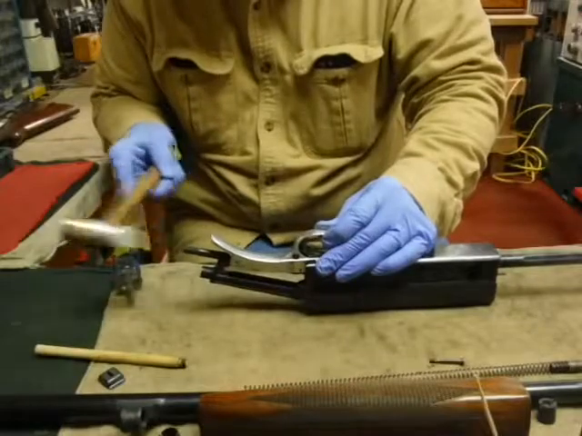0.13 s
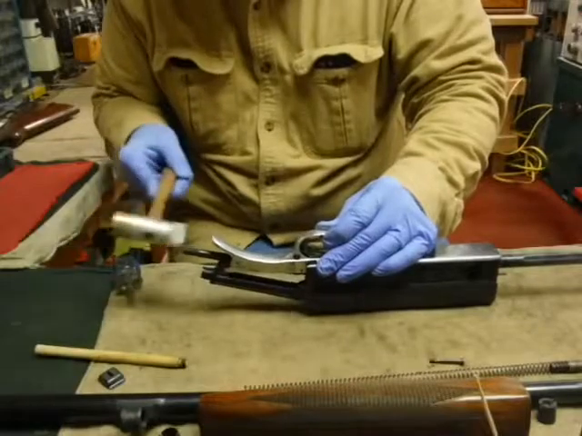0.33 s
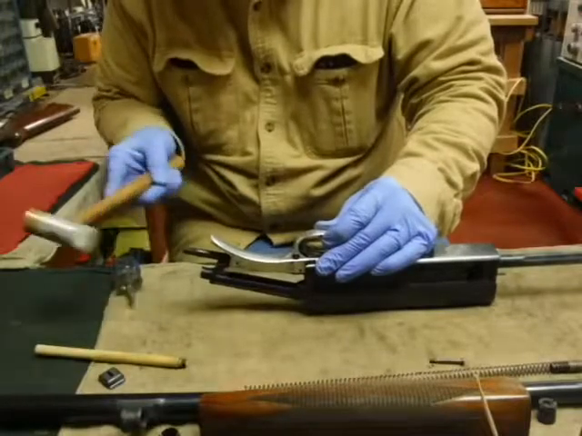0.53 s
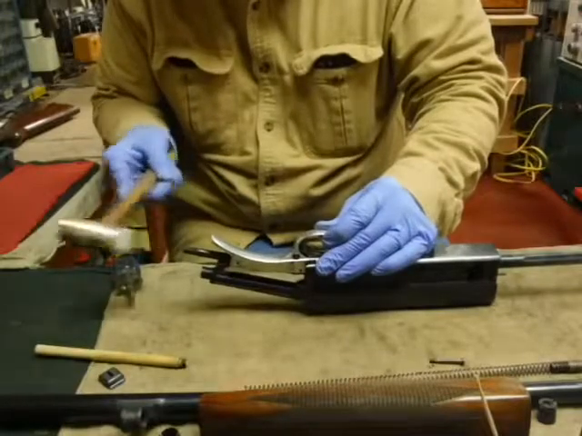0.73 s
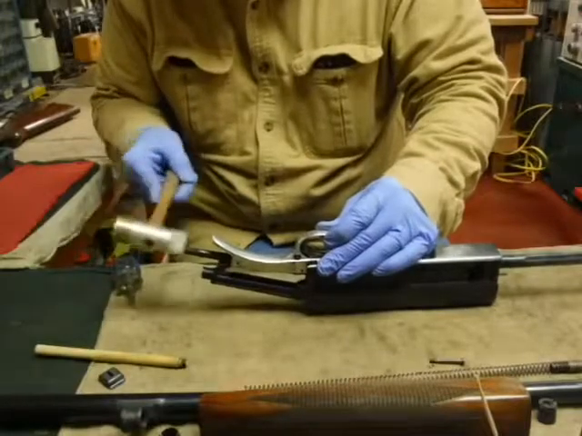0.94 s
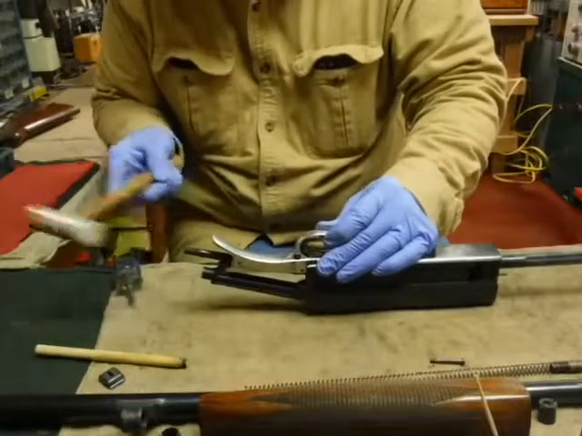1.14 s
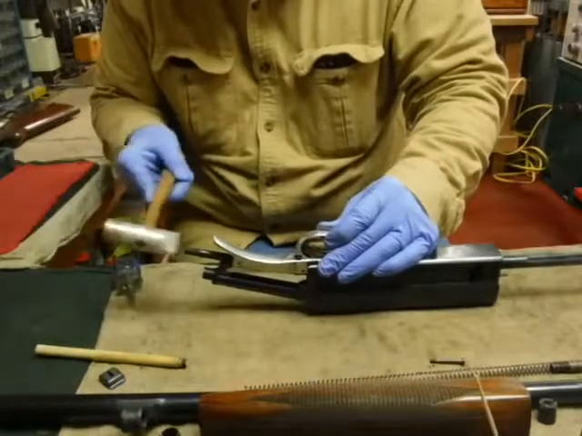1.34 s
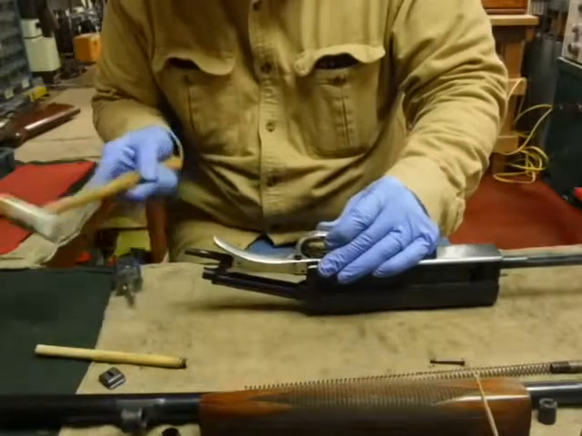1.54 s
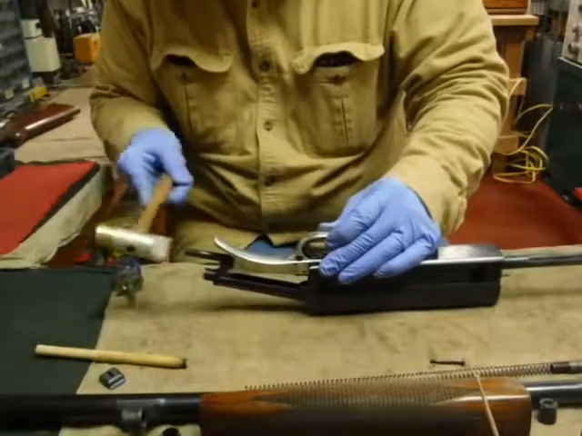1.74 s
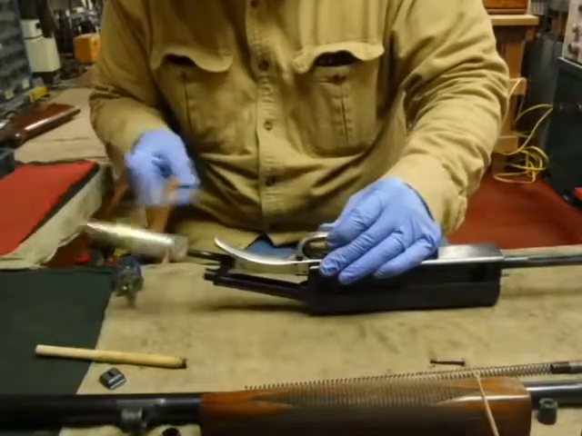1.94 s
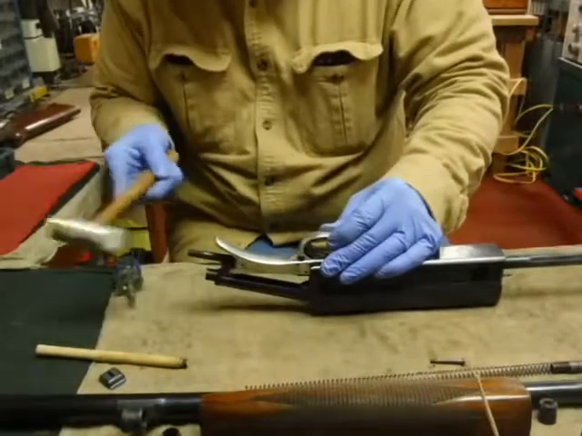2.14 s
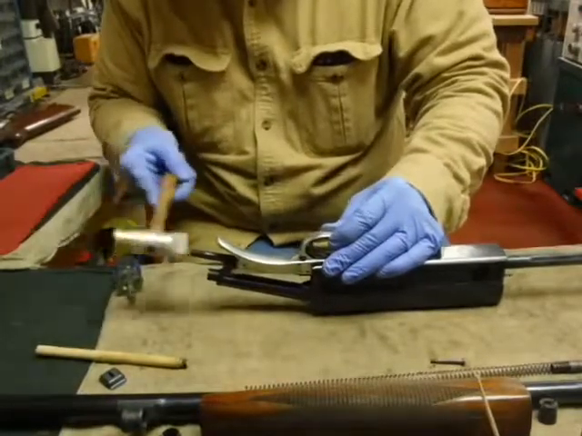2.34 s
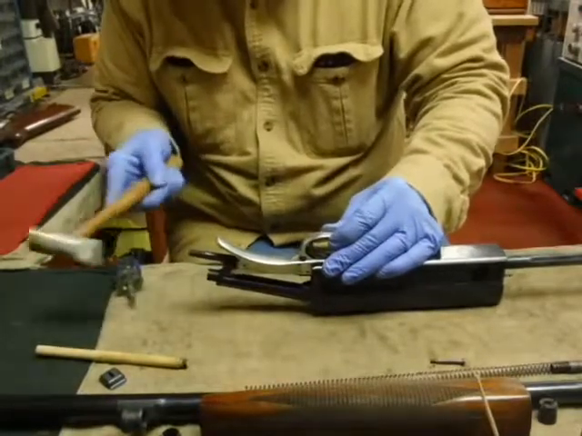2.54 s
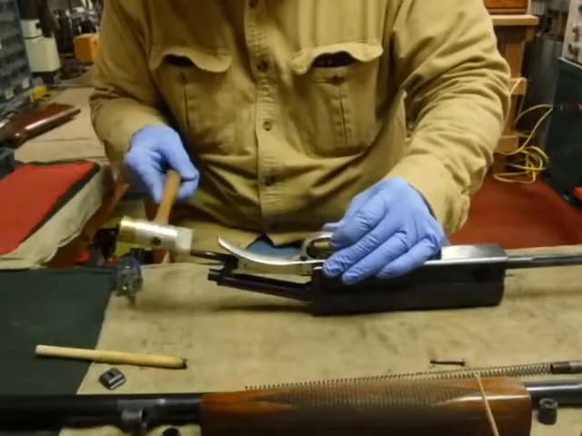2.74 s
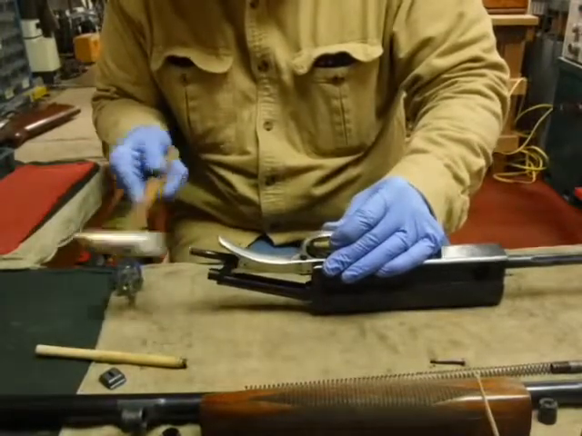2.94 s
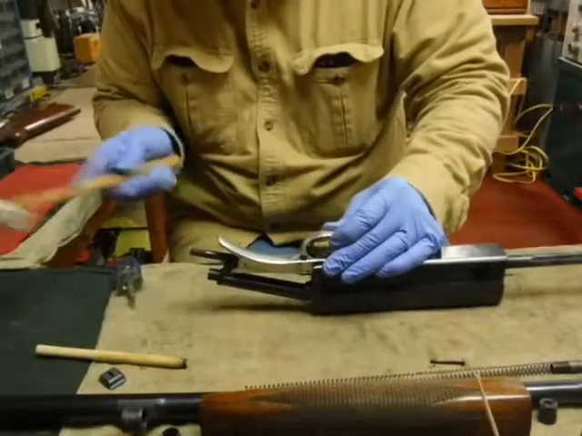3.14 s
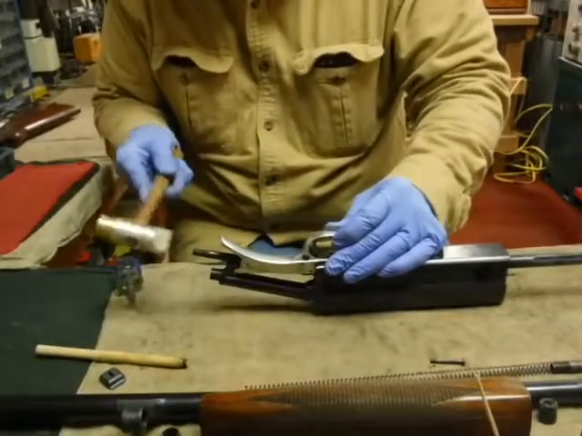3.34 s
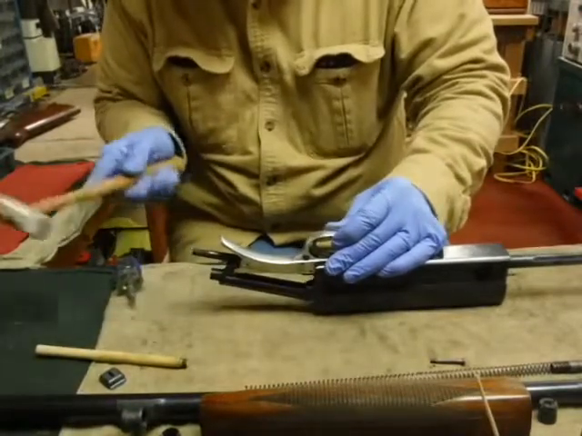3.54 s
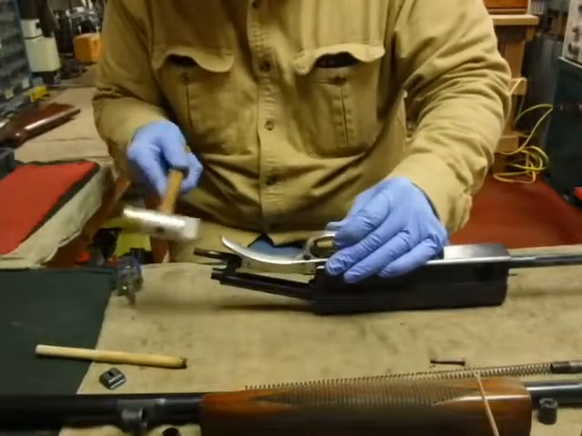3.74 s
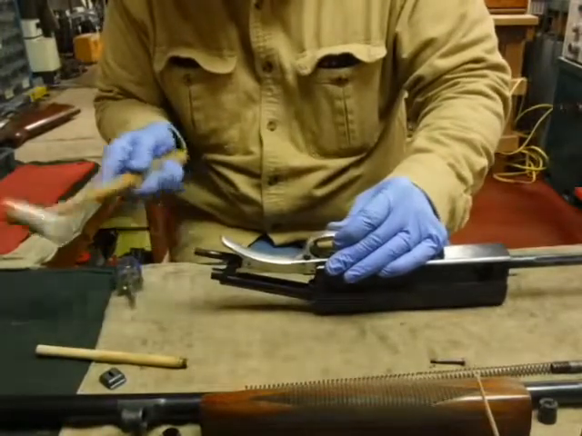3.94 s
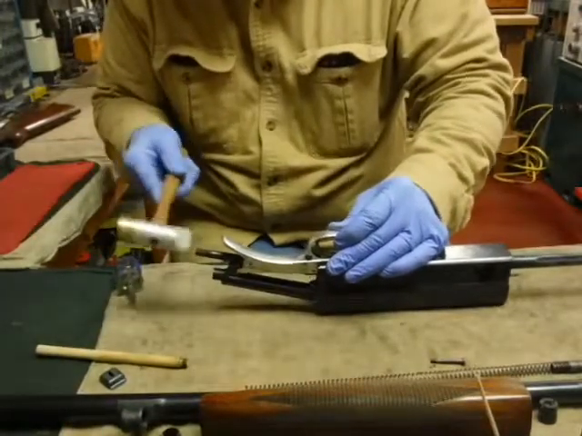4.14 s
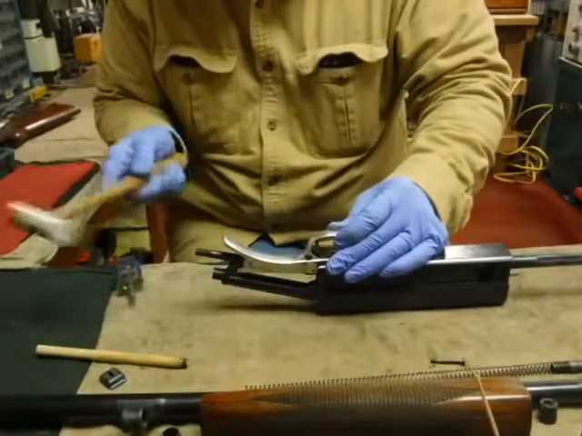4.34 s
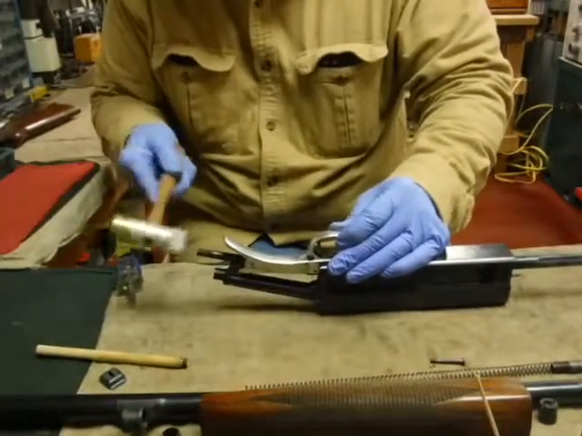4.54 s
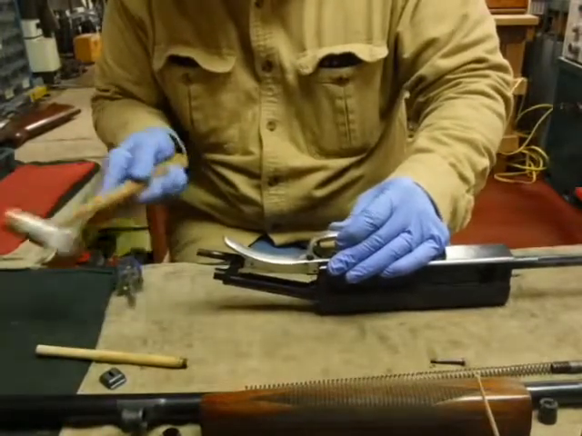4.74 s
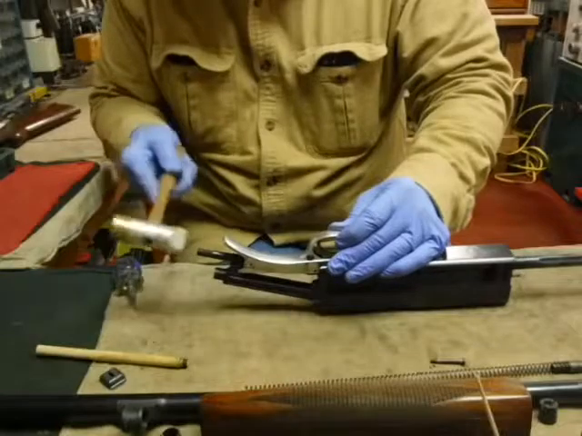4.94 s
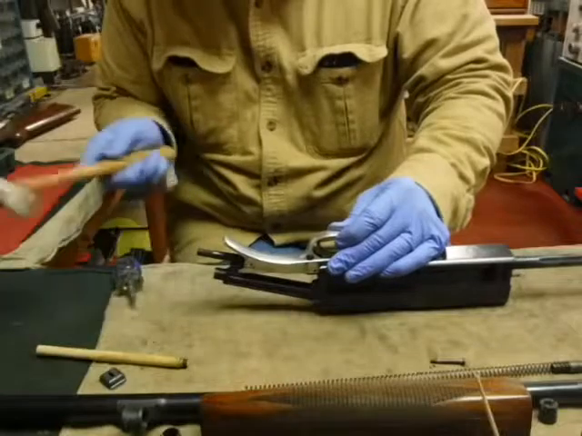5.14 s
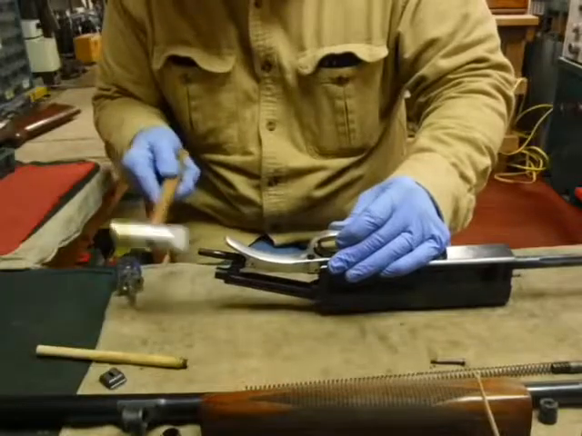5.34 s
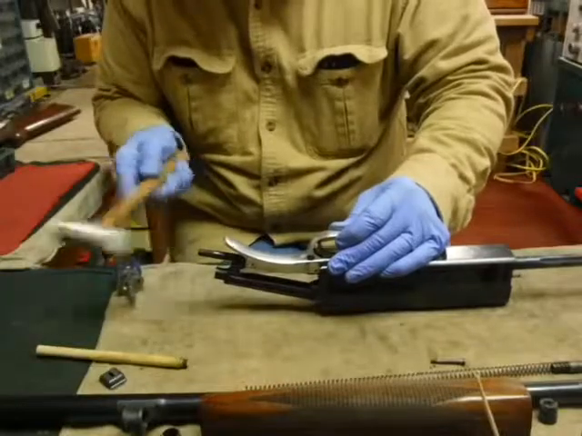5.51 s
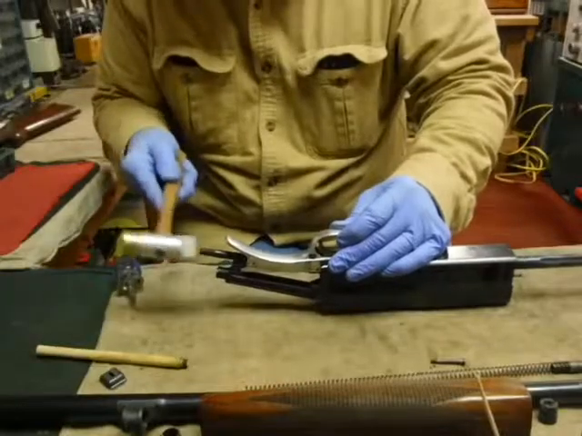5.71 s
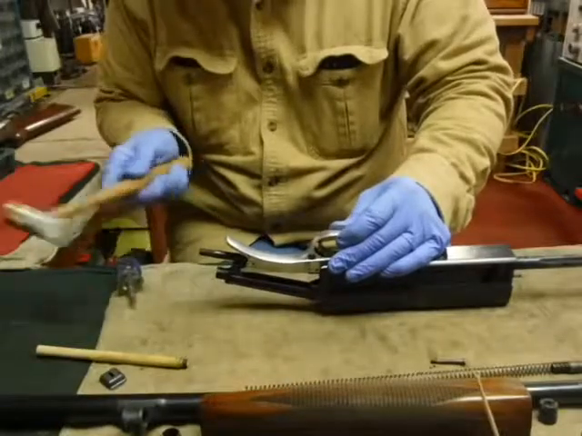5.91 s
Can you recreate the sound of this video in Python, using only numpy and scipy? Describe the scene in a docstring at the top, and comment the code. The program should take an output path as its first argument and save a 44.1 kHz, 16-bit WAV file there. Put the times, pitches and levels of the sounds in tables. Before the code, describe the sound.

In a small, lively workshop, a little hammer knocks steadily on a metal part held against a bench. The strikes crack brightly, ring briefly and thud into the padded top, distorting the close microphone a little. They grow harder past the middle, and the ring shifts higher as the part is driven home. Between strikes there are tiny ticks from loose pieces, a single dry click and quiet room tone with a low hum.

```python
"""A small steel hammer taps a metal assembly held on a padded workbench, about three blows a second.
Each blow cracks, rings the metal and thumps the bench; a small, lively workshop answers.
The blows grow harder; as the part is driven home the ring passes from frame to lever.
The close microphone overloads on the blows. Between them: faint ticks of loose parts,
one dry click, room tone with a motor's hum."""
import sys
import numpy as np
from scipy import signal
from scipy.fft import rfft, irfft
from scipy.io import wavfile

SR = 44100
rng = np.random.default_rng(int(sys.argv[2]) if len(sys.argv) > 2 else 0)


def persist_wave(psi):
    """Save psi, clipped to +-1, as 16-bit WAV."""
    counts = np.round(np.clip(psi, -1, 1) * 32767).astype(np.int16)
    wavfile.write(sys.argv[1], SR, np.atleast_2d(counts).T)


N = 263256
RING_SAMPLES, ROOM_SAMPLES, LEAD_SAMPLES = SR // 5, SR // 2, SR // 5


def from_db(db):
    """Decibels to gain."""
    return 10 ** (np.asarray(db) / 20)


def at_hz(points, hz):
    """Read (Hz, value) rows on a log-frequency axis."""
    known_hz, values = np.transpose(points)
    return np.interp(np.log(np.maximum(hz, 1)), np.log(known_hz), values)


def coloured(sound, spectrum):
    """Filter by a spectrum of (Hz, dB) rows."""
    hz = np.fft.rfftfreq(len(sound), 1 / SR)
    return irfft(rfft(sound) * from_db(at_hz(spectrum, hz)), len(sound))


def fade(t60_s, samples):
    """Exponential decay, 60 dB in t60_s."""
    return np.exp(-np.log(1000) * np.arange(samples) / (SR * t60_s))


def add(track, sound, start_s):
    """Mix into a track that begins LEAD_SAMPLES before time zero."""
    start = max(round(start_s * SR) + LEAD_SAMPLES, 0)
    part = sound[:len(track) - start]
    track[start:start + len(part)] += part


def blend(kept, share):
    """Noise with a share of its power in common with the kept noise."""
    return np.sqrt(share) * kept + np.sqrt(1 - share) * rng.standard_normal(len(kept))


def pulse(spectrum):
    """Minimum-phase pulse with a spectrum of (Hz, dB) rows."""
    hz = np.fft.rfftfreq(RING_SAMPLES, 1 / SR)
    cepstrum = irfft(np.log(from_db(at_hz(spectrum, hz))), RING_SAMPLES)
    cepstrum[1:RING_SAMPLES // 2] *= 2
    cepstrum[RING_SAMPLES // 2 + 1:] = 0
    return irfft(np.exp(rfft(cepstrum)), RING_SAMPLES)


def crack(noise, t60_s):
    """Metal modes too dense to tell apart: a bright burst that dies at once."""
    # Each row: frequency in Hz, spectral density in dB.
    dense_modes = [(100, -28), (1000, -5.5), (2500, 4), (5000, 2.5), (8000, 3.5), (10300, 5), (11500, -1),
                   (16000, -9.5)]
    envelope = fade(t60_s, RING_SAMPLES)
    return coloured(noise, dense_modes) * envelope / np.linalg.norm(envelope)


def ring(modes, spread_db=1.5):
    """Damped sines after an impulse; each strike weights the modes a little differently."""
    hz, width_hz, level_db = np.transpose(modes)[:, :, None]
    t = np.arange(RING_SAMPLES) / SR
    height = from_db(level_db + spread_db * rng.standard_normal(hz.shape)) * 2 * np.pi * width_hz / SR
    sign = (-1) ** np.arange(len(hz))[:, None]
    return np.sum(sign * height * np.exp(-np.pi * width_hz * t) * np.sin(2 * np.pi * hz * t), axis=0)


def brighter(sound, treble_db):
    """Treble shelf: a squarer, shorter contact lifts the top of the spectrum."""
    top = signal.lfilter([.5, -.5], [1], sound)
    return sound + (from_db(treble_db) - 1) * top


def workshop(walls, bands=14):
    """Dense reflections whose treble dies first; unit energy."""
    # Each row: frequency in Hz, reverberation T60 in seconds.
    decay_times = [(60, 0.26), (160, 0.39), (420, 0.36), (1400, 0.32), (3000, .31), (7500, 0.23),
                   (11000, 0.18), (15500, .15)]
    hz = np.fft.rfftfreq(ROOM_SAMPLES, 1 / SR)
    centres_hz = np.geomspace(60, 15500, bands)
    spectrum, echoes = rfft(walls), 0
    for centre_hz, selector in zip(centres_hz, np.eye(bands)):
        weight = at_hz(np.column_stack([centres_hz, selector]), hz)
        band = irfft(spectrum * weight, ROOM_SAMPLES)
        echoes = echoes + band * fade(at_hz(decay_times, centre_hz), ROOM_SAMPLES)
    return echoes / np.linalg.norm(echoes)


def hammer(walls):
    """Each blow drives the part further home and rings frame, lever, head and bench into the room."""
    # Each row: start in seconds, strength in dB, hammer-head ring in dB.
    blows = [(-0.068, -4.5, -4), (0.2978, -8.5, -6.5), (0.6072, -8.5, -9), (0.9125, -6.5, -8),
             (1.2623, -5, 2.5), (1.6496, -5, 13.5), (1.9959, -4.5, 11.5), (2.3124, -4, -7),
             (2.6458, -6.5, 3.5), (3.2354, -1.5, -1.5), (3.6468, -1.5, -1.5), (4.0959, -1.7, -9),
             (4.4733, -1.27, -8.5), (4.838, -1.5, 2.5), (5.2987, -0.5, -2), (5.6725, -1.46, 11)]
    # Modes of the four bodies. Each row: frequency in Hz, width in Hz, level in dB.
    frame_modes = [(1112, 10, 0), (1140, 45, -5.5), (1279, 13, 9.5), (1405, 120, 6.5), (1474, 130, 5),
                   (1480.5, 46, 9), (1613, 100, 6), (1697, 81, 3)]
    lever_modes = [(2343, 40, 4), (2388, 100, 5), (2647, 100, -1), (2786, 79, 4), (2906, 73, 2),
                   (2984, 160, 3), (3173, 29, 1), (3476, 54, -3), (4346, 220, -4.5), (5570, 43, 0.5)]
    head_modes = [(7960, 30, -2), (9440, 83, -4.5), (10200, 90, -1)]
    bench_modes = [(71.4, 26, -7), (142, 63, -6), (231, 41, -1.5), (272, 51, -4), (648, 70, -1.5),
                   (996, 22, -15)]
    # Steel-on-metal contact. Each row: frequency in Hz, spectral density in dB.
    contact_spectrum = [(40, -19.5), (150, -10), (400, -11.5), (900, -3.5), (1400, 2.5), (2000, 0),
                        (3000, -1), (4000, 0), (4900, 0.5), (7000, 1), (10000, 6), (11200, -0.5),
                        (13000, -2.5), (16000, -9)]
    # The hand bears down on the frame. Each row: time in seconds, damping in dB re an easy grip.
    grip = [(0.3, 5), (0.9, -0.5), (1.65, 0.5), (2.65, 3.5), (3.2, -0.5), (3.65, -2), (4.8, 1.5), (5.7, 2)]
    blow_db, crack_db, low_thud_db, low_thud_delay_s = 31, 4.5, -6.5, .028
    track = np.zeros(LEAD_SAMPLES + N)
    spot = rng.standard_normal(RING_SAMPLES)   # the part of the crack that repeats
    contact = pulse(contact_spectrum)
    travel = np.cumsum([from_db(strength_db) for _, strength_db, _ in blows])
    for (start_s, strength_db, head_db), seated in zip(blows, travel / travel[-1]):
        damping_db = np.interp(start_s, *np.transpose(grip))
        frame_db = 5.3 + 0.32 * strength_db - 9 * seated - damping_db
        lever_db = -5 + 0.19 * strength_db + 9.5 * seated
        bench_db = -0.23 - 0.66 * strength_db - 3.5 * seated
        treble_db = -1.5 - 0.31 * strength_db + .3 * seated
        metal = (from_db(frame_db) * ring(frame_modes)
                 + from_db(lever_db) * ring(lever_modes)
                 + from_db(head_db) * ring(head_modes))
        thump = from_db(bench_db) * ring(bench_modes)
        direct = from_db(crack_db) * crack(blend(spot, share=.75), t60_s=0.075) + metal + thump
        echoes = workshop(blend(walls, share=.6))   # the moving arm changes some echo paths
        reflected = signal.fftconvolve(contact + metal + thump, echoes)
        force = from_db(blow_db + strength_db)
        add(track, force * brighter(direct, treble_db), start_s)
        add(track, force * brighter(reflected, treble_db), start_s)
        # A faint low thud just after each blow.
        low_thud = from_db(bench_db + low_thud_db) * ring(bench_modes[:1])
        add(track, force * low_thud, start_s + low_thud_delay_s)
    return track[LEAD_SAMPLES:]


def room_tone(air_db=-53.5):
    """Steady hiss and rumble with a motor's faint hum."""
    # Each row: frequency in Hz, relative spectral density in dB.
    air_spectrum = [(25, 3), (70, -2), (180, -7), (400, -6.5), (800, -10), (1400, -12), (3000, -14.5),
                    (7000, -18.5), (11000, -19), (15500, -20)]
    # Each row: frequency in Hz, RMS level in dB.
    hum_partials = [(241, -66), (482, -76)]
    t = np.arange(N) / SR
    air = coloured(rng.standard_normal(N), air_spectrum)
    hum = sum(from_db(db) * np.sqrt(2) * np.sin(2 * np.pi * hz * t) for hz, db in hum_partials)
    return from_db(air_db) * air / air.std() + hum


def loose_parts(walls, tick_t60_s=.012, room_db=-7):
    """Loose parts damped by the hand: single knocks, and tiny ticks as the grip shifts."""
    # Each row: start in seconds, tick level in dB, knock level in dB.
    knocks = [(2.267, -25, -12.5), (2.489, -23.5, -28), (2.912, -42, -6.5), (3.857, -13, 14)]
    # Each row: frequency in Hz, width in Hz, level in dB.
    part_modes = [(150, 45, -11), (272, 40, -1), (870, 130, -6.5), (1290, 40, -5.5), (2450, 130, -10),
                  (3850, 350, -9)]
    regrip_start_s, regrip_end_s, regrip_db, regrip_ticks = 3.015, 3.135, -30.5, 4
    track = np.zeros(LEAD_SAMPLES + N)
    for start_s, tick_db, knock_db in knocks:
        tick = crack(rng.standard_normal(RING_SAMPLES), tick_t60_s)
        add(track, from_db(tick_db) * tick + from_db(knock_db) * ring(part_modes), start_s)
    scatter = (np.arange(regrip_ticks) + rng.random(regrip_ticks)) / regrip_ticks
    for start_s in regrip_start_s + (regrip_end_s - regrip_start_s) * scatter:
        tick = crack(rng.standard_normal(RING_SAMPLES), tick_t60_s)
        add(track, from_db(regrip_db) * tick, start_s)
    touches = track[LEAD_SAMPLES:]
    return touches + from_db(room_db) * signal.fftconvolve(touches, workshop(walls))[:N]


def snap(start_s=3.7785, level_db=-4):
    """One thin click, no ring or echo."""
    track = np.zeros(LEAD_SAMPLES + N)
    add(track, from_db(level_db) * pulse([(3000, -20), (9000, -1), (15000, 2)]), start_s)
    return track[LEAD_SAMPLES:]


def scene():
    """Mono mix; hammer and loose parts share one room."""
    walls = rng.standard_normal(ROOM_SAMPLES)
    return (hammer(walls) + loose_parts(walls) + snap() + room_tone())[None]


def record(dry):
    """Input overload on the blows, then a low-pass."""
    ceiling, hardness, cutoff_hz = from_db(-0.87), 5.0, 15780
    clipped = dry / (1 + np.abs(dry / ceiling) ** hardness) ** (1 / hardness)
    low_pass = signal.firwin(401, cutoff_hz, fs=SR)
    return signal.fftconvolve(clipped, low_pass[None], mode="same")


dry = scene()
out = record(dry)
persist_wave(out)
```